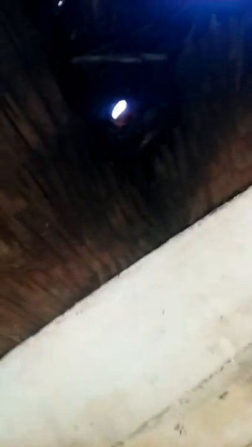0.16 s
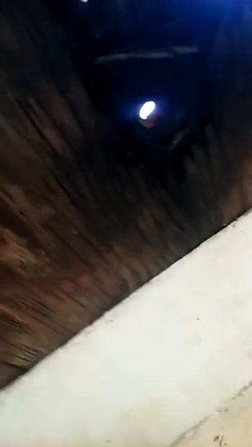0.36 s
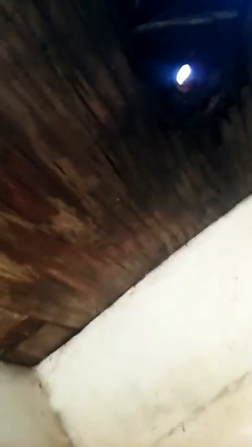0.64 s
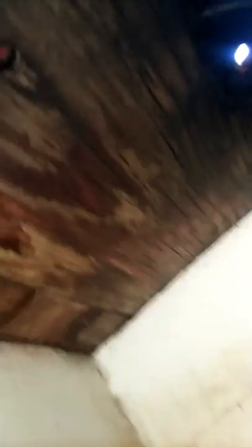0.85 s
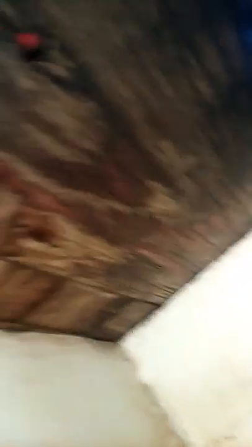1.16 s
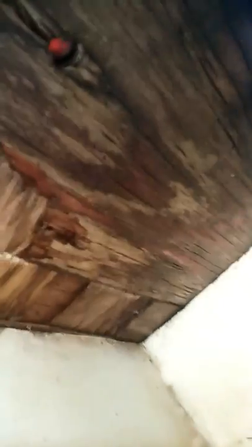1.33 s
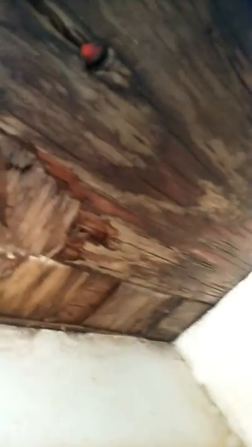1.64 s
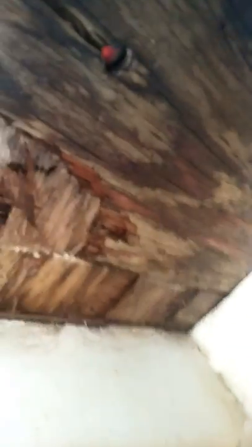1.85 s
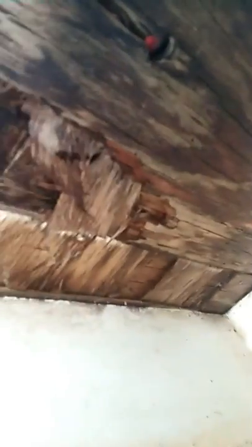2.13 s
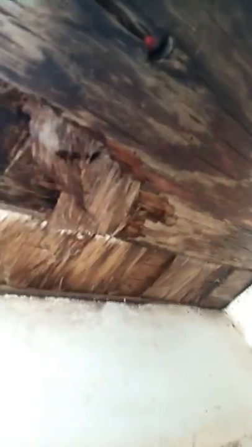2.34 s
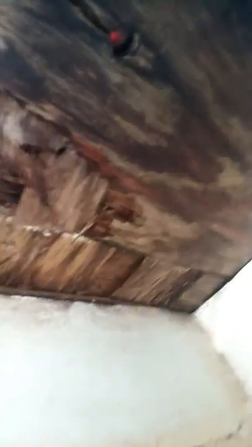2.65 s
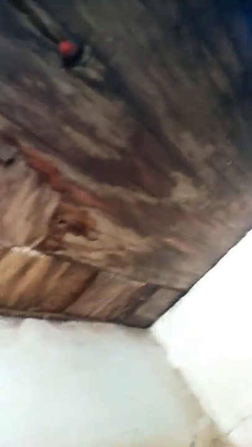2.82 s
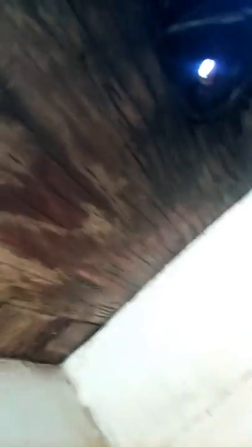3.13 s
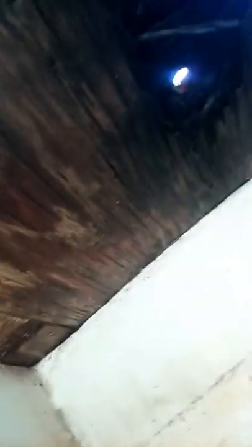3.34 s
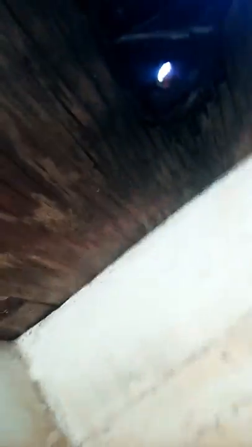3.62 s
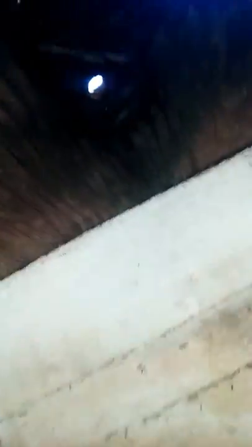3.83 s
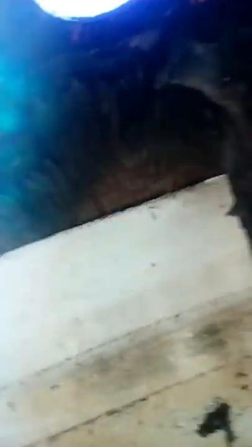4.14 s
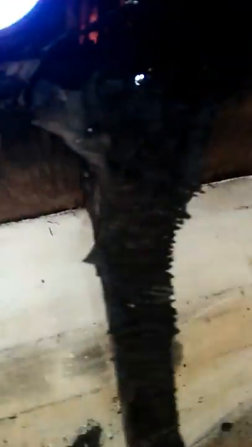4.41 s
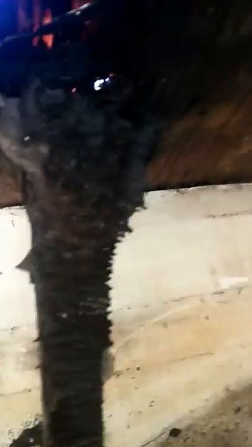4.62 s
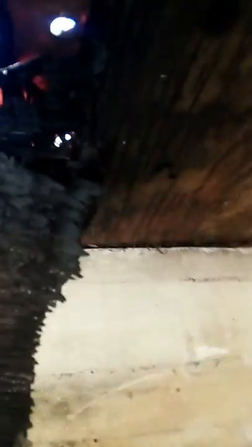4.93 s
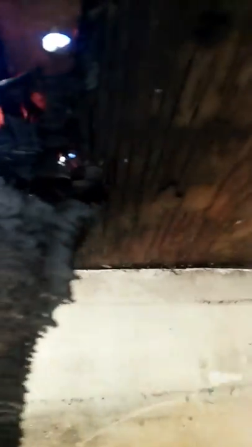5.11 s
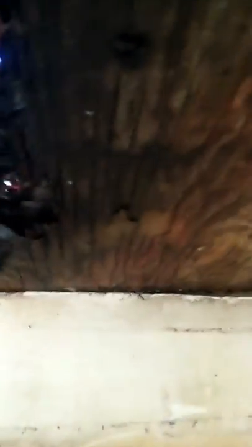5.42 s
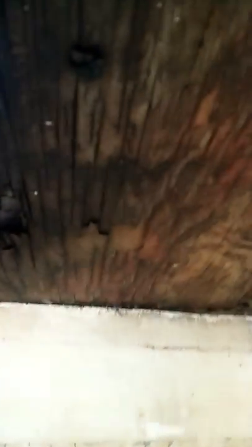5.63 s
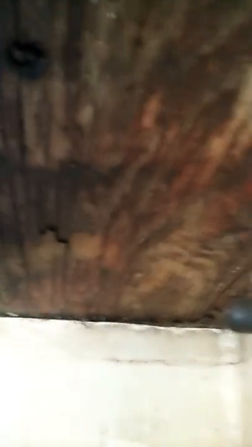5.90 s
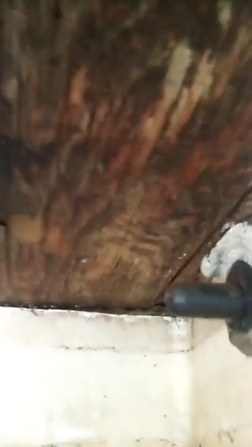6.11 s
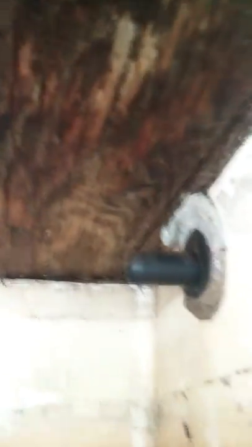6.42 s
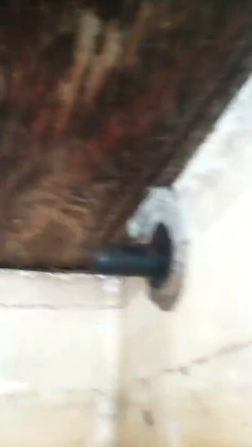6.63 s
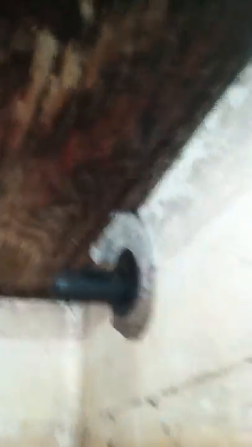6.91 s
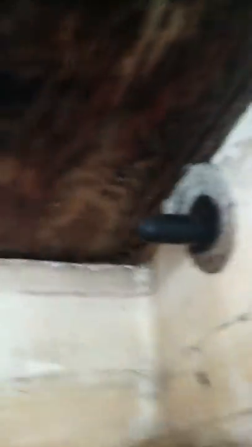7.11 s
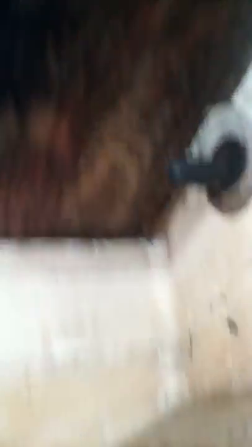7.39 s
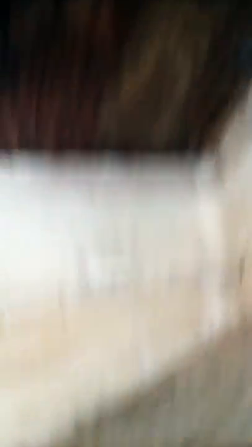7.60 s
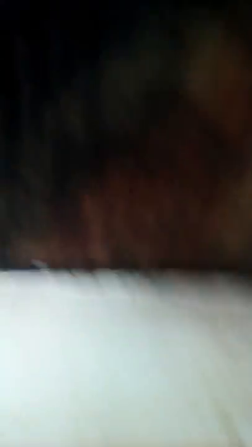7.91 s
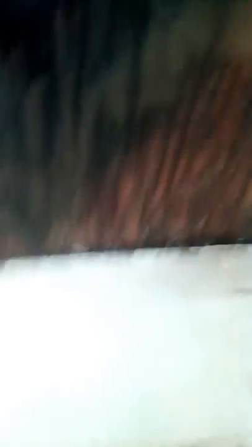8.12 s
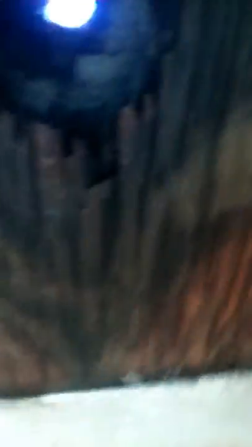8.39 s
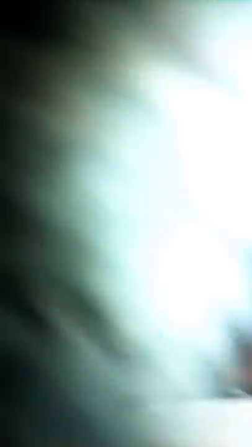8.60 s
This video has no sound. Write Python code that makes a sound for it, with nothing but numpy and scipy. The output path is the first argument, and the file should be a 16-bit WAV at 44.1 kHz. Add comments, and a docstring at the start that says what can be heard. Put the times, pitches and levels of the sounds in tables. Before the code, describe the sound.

Light brushing, a hard snap, quiet gaps, then firmer scrapes, heavy rubs and a flurry of bright clicks against boxy wooden boards.

```python
"""Small wood and fibreglass boat compartment: a hand holding a phone feels along the underside of the deck.
Skin and sleeve brush, scrape and shift on the case: random slips ring coloured filters under stroke envelopes.
Clicks and ticks are decaying noise bursts, soft knocks are damped board modes; these hits get a short, dull tail.
Handling drums a low boom (narrow noise) out of the hollow space; a faint outdoor hush (noise) fills the gaps."""
import sys
import numpy as np
from scipy import signal
from scipy.fft import rfft, irfft, next_fast_len
from scipy.io import wavfile
from scipy.ndimage import uniform_filter1d, map_coordinates

SR = 44100
rng = np.random.default_rng(int(sys.argv[2]) if len(sys.argv) > 2 else 0)


def generate_wav(signal):
    """Clip the signal to [-1, 1] and save it as 16-bit WAV at the path in sys.argv[1]."""
    frames = np.transpose(np.atleast_2d(signal))
    scaled = np.clip(frames, -1, 1) * 32767
    pcm = np.round(scaled).astype(np.int16)
    wavfile.write(sys.argv[1], SR, pcm)


N = 385875

# Broad colour of a hard rub, shared by shove and bump: freq_hz, density_db (relative, per Hz)
SHOVE_TONE = [(150, 9), (250, -2), (410, -1), (590, -6.5), (750, -4), (900, -11.5), (1200, -7.5),
              (1700, -11), (2200, -8), (4000, -10), (6600, -10.5), (8200, -21.5), (15800, -34.5)]
BOOM_T60_S = 0.28  # the hollow space dies away at its own pace, whatever the stroke


def amp(db):
    """Decibels to gain."""
    return 10 ** (np.asarray(db) / 20)


def unit(x):
    """Scale to rms 1."""
    return x / np.sqrt(np.mean(x ** 2) + 1e-20)


def along(points, hz):
    """Join (Hz, value) points on a log frequency axis."""
    f, v = np.transpose(points)
    return np.interp(np.log(hz + 1), np.log(f + 1), v)


def wobble(knots_per_s):
    """Smooth random curve through normally distributed knots."""
    knots = rng.standard_normal(int(N * knots_per_s / SR) + 4)
    return map_coordinates(knots, [np.arange(N) * knots_per_s / SR])


def response(colour_db, size=4096):
    """Causal (minimum-phase) impulse response of a colour in dB against Hz, by folding the cepstrum."""
    gain = amp(colour_db(np.fft.rfftfreq(size, 1 / SR)))
    cepstrum = irfft(np.log(gain + 1e-6))
    cepstrum[1:size // 2] *= 2
    cepstrum[size // 2 + 1:] = 0
    return irfft(np.exp(rfft(cepstrum)))


def coloured(x, tone, ring=()):
    """Filter x by a broad tone plus resonances (freq_hz, width_hz, lift_db)."""
    def colour_db(hz):
        lifts_db = sum(db / (1 + (2 * (hz - f) / width) ** 2) for f, width, db in ring)
        return along(tone, hz) + lifts_db
    return signal.oaconvolve(x, response(colour_db))[:len(x)]


def band(x, kind, edge_hz, order=4):
    """Butterworth high-pass or low-pass."""
    return signal.sosfilt(signal.butter(order, edge_hz, kind, fs=SR, output="sos"), x)


def patchy(x, depth_db, size=1024):
    """Random spectral gain, smoothed over frequency and time: the colour drifts as the contact point moves."""
    z = signal.stft(x, nperseg=size)[2]
    field = uniform_filter1d(rng.standard_normal(z.shape), size=6, axis=0)
    field = uniform_filter1d(field, size=12, axis=1)
    return signal.istft(z * amp(depth_db * unit(field)), nperseg=size)[1][:N]


def steady(x, span_s):
    """Even out chance swells to rms 1, as under a steady drag."""
    size = int(span_s * SR)
    power = uniform_filter1d(uniform_filter1d(x ** 2, size=size), size=size)
    return x / np.sqrt(np.abs(power) + 1e-12 * np.mean(x ** 2))


def add(track, s, sound):
    """Mix a sound in at time s."""
    part = track[round(s * SR):][:len(sound)]
    part += sound[:len(part)]


def sized(x, db, span):
    """Give x the energy that level db has over span seconds."""
    return amp(db) * x * np.sqrt(span * SR) / np.linalg.norm(x)


def envelope(start, length, attack_s, swell_db_per_s, release_s):
    """Contact builds up around the start, swells or sags while the hand moves, then dies with t60 release_s."""
    gain = np.zeros(N)
    first = max(start - attack_s / 2, 0)
    t = np.arange(first - start, length + release_s, 1 / SR)
    rise = np.sin(np.pi / 2 * np.clip(t / attack_s + .5, 0, 1)) ** 2
    held_db = swell_db_per_s * (np.clip(t, 0, length) - length / 2)
    release_db = -60 * np.maximum(t - length, 0) / release_s
    add(gain, first, rise * amp(held_db + release_db))
    return gain


def contact(rows, attack_s, swell_db_per_s, release_s):
    """Gains of boom, rub and hiss over one kind of stroke; hiss comes and goes first, boom comes last and dies
    at the hollow space's own pace."""
    hiss_lead_s = 0.0032  # the fingertips touch and leave before the palm
    boom_lag_s = 0.0055  # the hollow space answers late
    soft_db = 19.5  # a stroke this much softer than the hardest takes twice as long to build up
    boom, rub, hiss = np.zeros((3, N))
    hardest_db = max(row[2] for row in rows)
    for start, length, rub_db, hiss_db, boom_db in rows:
        rise_s = attack_s * 2 ** ((hardest_db - rub_db) / soft_db)
        rub_shape = envelope(start, length, rise_s, swell_db_per_s, release_s)
        hiss_shape = envelope(start - hiss_lead_s, length, rise_s, swell_db_per_s, 0.73 * release_s)
        boom_shape = envelope(start + boom_lag_s, length, rise_s, swell_db_per_s, BOOM_T60_S)
        rub = np.maximum(rub, amp(rub_db) * rub_shape)
        hiss = np.maximum(hiss, amp(rub_db + hiss_db) * hiss_shape)
        boom = np.maximum(boom, amp(rub_db + boom_db) * boom_shape)
    return boom, rub, hiss


def drone():
    """Low boom of the hollow space: coloured noise, its envelope evened as under a steady drag."""
    # freq_hz, density_db (relative, per Hz)
    boom_tone = [(25, -52), (40, -36), (55, -17), (80, -7), (100, -4.5), (118, 7), (138, -0.5), (165, -0.5),
                 (200, -9.5), (260, -15.5), (400, -56), (800, -101)]
    noise = rng.standard_normal(next_fast_len(N))
    wave = signal.hilbert(coloured(noise, boom_tone))[:N]
    power = uniform_filter1d(np.abs(wave) ** 2, size=2200)
    return unit(wave.real / np.sqrt(np.abs(power) + 1e-12))


def stroke(gains, tone, ring, slips_per_s, grit, judder_db, drift_db, bite_db):
    """Friction: tiny slips over the wood grain, in uneven bunches, ring the touched surface."""
    boom, rub, hiss = gains
    slips = (rng.random(N) < slips_per_s / SR) * rng.standard_normal(N)
    force = rng.standard_normal(N) + grit * unit(slips)
    force = force * amp(judder_db * wobble(130))
    sound = coloured(patchy(force, drift_db), tone, ring)
    # the palm drives the board and the fingertips the hiss, so each catches on its own
    mids = band(band(sound, "high", 215), "low", 2006)
    body = steady(mids * amp(2.2 * wobble(50)), span_s=0.043)
    fizz = steady(band(sound, "high", 2690) * amp(1.6 * wobble(70)), span_s=0.039)
    # the harder the stroke, the more the finest fibres crackle on top
    hardness = (hiss / hiss.max()) ** .55
    crackle = amp(bite_db) * hardness * unit(band(slips, "high", 6600))
    return rub * body + hiss * (fizz + crackle) + boom * drone()


def brush():
    """Light brushing close to the phone: dense slips ring the boards."""
    # Strokes: start_s, length_s, rub_db, hiss_over_rub_db, boom_over_rub_db
    strokes = [(0, 0.026, -53, -5.5, -2), (.14, 0.04, -58.5, -5, 5), (.315, 0.029, -55, -6.5, 7),
               (.711, 0.041, -47, 0.5, 1), (.738, 0.05, -47, 4, 3), (.82, 0.12, -54.5, 2, 4),
               (1, 0.074, -66, 0.5, 7), (1.18, 0.023, -57.5, -3, 8.5), (1.33, 0.033, -63, -1, 5),
               (1.54, 0.019, -62.5, -2, 5), (3.12, 0.01, -53.5, -2.5, 8), (3.17, 0.17, -66.5, 2.5, 9),
               (3.348, 0.01, -52.5, -12.5, 4), (3.49, 0.073, -54, -4.5, -1), (3.632, 0.064, -52, -4.5, -3),
               (3.722, 0.046, -49.5, -5, 0.5), (3.885, 0.042, -71.5, 8.5, 12.5),
               (4.007, .04, -45, -3.5, -2), (4.048, 0.047, -41.5, -1, 2.5), (4.15, 0.059, -50.5, 4, -8),
               (4.335, .085, -56, -4.5, -22), (4.415, .05, -50, -6, -12), (4.46, 0.061, -46, -8, -11.5),
               (4.55, 0.14, -61, -13, -2.5), (4.73, 0.071, -55.5, -14.5, -11),
               (4.85, 0.064, -55.5, -10.5, -5), (4.93, 0.035, -55, -12.5, -8)]
    # Broad colour: freq_hz, density_db (relative, per Hz)
    tone = [(150, -2.5), (230, -4.5), (330, 2), (520, -12.5), (800, -14.5), (1250, -15), (1800, -17),
            (2500, -20), (3200, -18.5), (4300, -15), (6600, -18), (9500, -31), (15800, -38)]
    # Resonances: freq_hz, width_hz, lift_db
    ring = [(668, 46, 7.5), (928, 900, 0), (1040, 23, 10), (1275, 86, 2), (1760, 430, 0), (1940, 74, 11),
            (2167, 92, 10.5), (2470, 380, 0), (3160, 280, 5.5), (3880, 810, -7), (4750, 400, -5),
            (5500, 200, 3.5), (6230, 380, 5.5)]
    gains = contact(strokes, attack_s=0.017, swell_db_per_s=-11.5, release_s=0.34)
    return stroke(gains, tone, ring, slips_per_s=840, grit=0.39, judder_db=-0.2, drift_db=2.5, bite_db=-16.5)


def palm():
    """The palm drags without scratching: it catches unevenly and drums only the hollow space."""
    # Drags: start_s, length_s, level_db
    drags = [(0, 0.34, -51), (0.444, 0.082, -50), (0.596, 0.086, -47.5), (2.85, 0.057, -64),
             (3.418, 0.072, -60), (7.524, 0.18, -56), (7.894, 0.28, -54)]
    gain = np.zeros(N)
    for start, length, db in drags:
        gain += amp(db) * envelope(start, length, attack_s=0.016, swell_db_per_s=-19.5, release_s=BOOM_T60_S)
    return gain * unit(drone() * amp(2.8 * wobble(30)))


def hush():
    """Faint outdoor noise seeps through the hull, under a thin hiss; both swell, sink and briefly dip."""
    # Levels: time_s, outdoor_db, hiss_db
    swells = [(0, -63.5, -69.5), (.6, -61.5, -71.5), (1.05, -62.5, -68), (1.45, -66, -74),
              (1.7, -60.5, -78), (1.95, -61, -81), (2.33, -62.5, -75.5), (2.42, -68.5, -86.5),
              (2.94, -66, -81.5), (3.2, -64, -70.5), (4.2, -62.5, -67), (5, -60, -75), (6.3, -58, -73),
              (6.95, -56.5, -72.5), (7.7, -64.5, -68), (8.3, -57, -69), (8.75, -60.5, -75)]
    # Outdoor colour: freq_hz, density_db (relative, per Hz)
    tone = [(30, -20), (60, 5.5), (115, 14), (170, 4), (260, -1.5), (350, 8), (510, -1), (720, 3.5),
            (1020, 3), (1400, -0.5), (1900, -3.5), (2500, -8.5), (3200, -18), (5500, -15.5), (8000, -22.5),
            (15800, -46)]
    # Brief dips: centre_s, half_width_s (to 1/e of the depth), depth_db
    dips = [(2.8, 0.023, -12), (3.05, 0.059, -7.5)]
    t = np.arange(N) / SR
    times, *levels = np.transpose(swells)
    outdoor_db, hiss_db = (np.interp(t, times, level) for level in levels)
    dip_db = sum(db * np.exp(-((t - s) / width) ** 2) for s, width, db in dips)
    outdoors = unit(coloured(patchy(rng.standard_normal(N), depth_db=3.5), tone))
    hiss = unit(band(rng.standard_normal(N), "high", 2400, order=1))
    return amp(dip_db) * (amp(outdoor_db) * outdoors + amp(hiss_db) * hiss)


def burst(t, t60, spike):
    """Sudden release (one-sample spike) followed by exponentially dying noise chatter."""
    chatter = rng.standard_normal(len(t)) * amp(-60 * t / max(t60, .002))
    return chatter / np.linalg.norm(chatter) + spike * (t == 0)


def snap(t, t60, ring_hz):
    """Bright tick: its whole colour scales with ring_hz, lower for a larger splinter."""
    # ring_multiple, level_db
    snap_tone = [(.25, -27), (.4, -8), (.6, -12.5), (.78, -10.5), (1, -5), (1.2, -0.5), (1.4, -9),
                 (1.75, -15.5), (2.7, -25.5), (4, -48.5)]
    tone = [(multiple * ring_hz, db) for multiple, db in snap_tone]
    return coloured(burst(t, t60, spike=0.25), tone, [(ring_hz, 900, 10)])


def clicks():
    """A nail or splinter snaps free: ringing tick over a slower wooden body."""
    # Clicks: time_s, snap_db, body_db, ring_hz
    events = [(.177, -45, -65, 5100), (.282, -45, -76, 5450), (.902, -28.5, -31.5, 5500),
              (1.2041, -53.5, -64, 5740), (1.9913, -51.5, -83, 5500), (2.859, -54.5, -68, 2580),
              (3.633, -49.5, -66, 5800), (3.843, -56, -52.5, 5040), (4.626, -57.5, -58, 6300),
              (4.832, -60, -54.5, 5500), (5.228, -59.5, -50.5, 3200), (6.199, -52, -58, 6000),
              (6.556, -59, -52.5, 5640), (7.044, -57, -70, 5770), (8.117, -44, -45.5, 5500),
              (8.199, -45, -49.5, 5600), (8.371, -58, -42.5, 5400), (8.4445, -32, -41, 5400),
              (8.543, -40, -55, 6200), (8.593, -28, -40.5, 5870), (8.629, -46, -54, 4800)]
    # Wooden body colour: freq_hz, level_db
    body_tone = [(60, -18.5), (150, -10), (355, 3), (550, 0.5), (1100, -3), (1700, -5.5), (2150, -9),
                 (2800, -12.5), (3600, -6.5), (6000, -34)]
    decay_cycles = 160  # snap t60 in ring cycles, so low clicks last longer
    out, t = np.zeros(N), np.arange(SR // 6) / SR
    for s, snap_db, body_db, ring_hz in events:
        t60 = decay_cycles / ring_hz
        body = coloured(burst(t, 1.3 * t60, spike=0.39), body_tone)
        add(out, s, sized(snap(t, t60, ring_hz), snap_db, span=0.0046))
        add(out, s, sized(body, body_db, span=0.009))
    return out


def ticks():
    """Single fibres let go, too light to move the board: only a short, dry, bright tick."""
    # Ticks: time_s, level_db
    events = [(0.273, -59), (1.05, -49), (1.0825, -57), (1.107, -62), (1.123, -57), (1.2513, -61),
              (1.269, -61), (5.743, -66)]
    tick_hz, tick_t60_s = 5920, .009
    out, t = np.zeros(N), np.arange(SR // 20) / SR
    for s, db in events:
        add(out, s, sized(snap(t, tick_t60_s, tick_hz), db, span=0.0065))
    return out


def knocks():
    """A soft bump of the hand rings the board's low modes while the skin slaps and slides."""
    # Knocks: time_s, thud_db, slap_db
    events = [(1.189, -51, -66), (1.322, -46, -53.5), (1.5233, -40, -57.5), (2.129, -48, -66),
              (2.2481, -46.5, -62), (3.124, -47, -59.5), (3.3115, -44, -58.5), (3.887, -53, -61),
              (4.836, -42.5, -68), (7.129, -48, -68)]
    # Mean board modes: freq_hz, level_db (relative), t60_s
    board = [(119, -3.5, 0.06), (166, 0, 0.061), (222, 4.5, 0.036), (323, -1.5, 0.048), (399, -9.5, 0.11),
             (558, -10, 0.039), (678, -5.5, 0.029), (1035, -20.5, 0.054)]
    out, t = np.zeros(N), np.arange(SR // 4) / SR
    for s, thud_db, slap_db in events:
        thud = np.zeros(len(t))
        for hz, db, t60 in board:
            mode_hz = hz * (1 + rng.normal(0, 0.0089))
            phase = 2 * np.pi * (mode_hz * t + rng.random())
            thud += amp(db + rng.normal(0, 3) - 60 * t / t60) * np.sin(phase)
        thud *= 1 - np.exp(-t / 0.0057)  # flesh cushions the attack
        add(out, s, sized(thud, thud_db, span=0.014))
        add(out, s, sized(snap(t, 0.047, 5720), slap_db, span=0.014))
    return out


def fibres(start, end, loudest_db, count):
    """Loose fibres catch on the slowly sliding sleeve: faint ticks at random times, levels and pitches."""
    out, t = np.zeros(N), np.arange(SR // 20) / SR
    for when, softness, pitch in rng.random((count, 3)):
        tick = snap(t, 0.038, 3500 + 3000 * pitch)
        add(out, start + when * (end - start), sized(tick, loudest_db - 9 * softness, span=0.022))
    return out


def compartment(x):
    """The close walls answer with a short, dull tail: convolution with decaying low-passed noise."""
    t = np.arange(SR // 4) / SR
    noise = band(rng.standard_normal(len(t)), "low", 5400, order=1)
    tail = noise * amp(-60 * t / 0.39) * (t > .003)
    return signal.oaconvolve(x, tail / np.linalg.norm(tail))[:N]


def scrape():
    """The arm slides along the boards: sparser slips, slow attack."""
    # Strokes: start_s, length_s, rub_db, hiss_over_rub_db, boom_over_rub_db
    strokes = [(5.21, 0.061, -63.5, -1.5, -4), (6.21, .06, -56, -5.5, -12), (6.272, 0.058, -45, -7.5, -10),
               (6.34, .2, -49.5, -6.5, -15), (6.56, 0.061, -53.5, -7, -17), (6.735, 0.099, -53, -4, -14),
               (7.055, .04, -44.5, -5.5, -24), (7.095, 0.027, -41, -5, -16), (7.17, 0.12, -66.5, 1, 5.5)]
    # Broad colour: freq_hz, density_db (relative, per Hz)
    tone = [(150, -22), (230, -8), (400, 1.5), (560, -3.5), (750, 6), (1250, -0.5), (1700, -1.5),
            (2800, -7.5), (3400, -12), (5700, -21.5), (8000, -24.5), (15800, -41)]
    # Resonances: freq_hz, width_hz, lift_db
    ring = [(318, 89, 10), (515, 33, 8), (684, 33, 11), (960, 90, 5.5), (1700, 300, 8), (2390, 470, -7),
            (2720, 76, 9.5), (3620, 500, -9.5), (4450, 170, 6.5), (5750, 1200, 9.5)]
    gains = contact(strokes, attack_s=0.057, swell_db_per_s=-16, release_s=0.19)
    return stroke(gains, tone, ring, slips_per_s=300, grit=0.53, judder_db=0.5, drift_db=2.5, bite_db=-28.5)


def shove():
    """A hard shove past an edge: dense slips, quick release."""
    # Strokes: start_s, length_s, rub_db, hiss_over_rub_db, boom_over_rub_db
    strokes = [(7.326, 0.076, -43, -3, -6), (7.417, 0.039, -37.5, -3, -14)]
    # Resonances: freq_hz, width_hz, lift_db
    ring = [(329, 79, 12.5), (493, 50, 5.5), (570, 51, -7), (656, 30, 15), (1024, 81, 14.5),
            (1280, 46, -16), (1685, 140, 9), (2360, 300, -12), (3850, 250, 6), (4520, 300, -11.5),
            (5600, 180, 4), (6760, 330, 6)]
    gains = contact(strokes, attack_s=0.031, swell_db_per_s=-11, release_s=0.11)
    return stroke(gains, SHOVE_TONE, ring, slips_per_s=990, grit=0.52, judder_db=1.6, drift_db=3.1, bite_db=-25)


def bump():
    """A short, heavy swipe wakes the panel's resonances and sags fast."""
    # Strokes: start_s, length_s, rub_db, hiss_over_rub_db, boom_over_rub_db
    strokes = [(7.801, 0.059, -40, -3, -4), (7.955, 0.028, -50, -6.5, 1), (7.98, 0.029, -47, -7, 2.5)]
    # Resonances: freq_hz, width_hz, lift_db
    ring = [(403, 70, 9.5), (667, 37, 15), (1071, 51, 17), (1310, 60, -3), (2080, 180, -16),
            (3200, 410, 2.5), (4270, 200, 2.5), (6300, 500, 2.5)]
    gains = contact(strokes, attack_s=0.027, swell_db_per_s=-66, release_s=0.14)
    return stroke(gains, SHOVE_TONE, ring, slips_per_s=940, grit=0.48, judder_db=2.55, drift_db=1.0, bite_db=-19)


def grip():
    """Fingers shift on the case: gritty, juddering slips."""
    # Strokes: start_s, length_s, rub_db, hiss_over_rub_db, boom_over_rub_db
    strokes = [(8.09, 0.45, -59.5, 0, 3.5), (8.113, 0.021, -45.5, -1.5, -11), (8.14, 0.038, -55, 3.5, 1),
               (8.19, 0.01, -46, 3.5, -19), (8.268, 0.018, -48.5, -2, -5), (8.345, .02, -49, -1, 0),
               (8.369, 0.022, -42.5, 0.5, -4.5), (8.405, 0.067, -50.5, -0.5, 0),
               (8.536, 0.051, -46.5, 3, -5), (8.64, 0.084, -51, 4, 3)]
    # Broad colour: freq_hz, density_db (relative, per Hz)
    tone = [(150, -5), (250, -1.5), (400, 3.5), (550, -10.5), (800, -1.5), (1250, -2.5), (1700, -30),
            (2300, -13), (3000, -10.5), (6400, -6.5), (8000, -16), (11000, -20), (15800, -29)]
    # Resonances: freq_hz, width_hz, lift_db
    ring = [(372, 76, 3.3), (679, 100, 12.6), (1037, 32, 9.8), (1250, 62, 8), (1800, 190, 1),
            (2800, 200, 6.3), (4340, 290, 3.6), (5130, 230, 4)]
    gains = contact(strokes, attack_s=0.014, swell_db_per_s=6, release_s=0.13)
    return stroke(gains, tone, ring, slips_per_s=720, grit=0.62, judder_db=2.7, drift_db=1.0, bite_db=-14.0)


def scene():
    """Rubbing, hits and the hits' echo over the hush."""
    rubbing = brush() + palm() + scrape() + shove() + bump() + grip()
    hits = clicks() + ticks() + knocks() + fibres(start=4.6, end=7.3, loudest_db=-67.5, count=20)
    echo = amp(-21) * compartment(hits)
    return (rubbing + hits + echo + hush())[None]


def record(dry):
    """The phone keeps nothing above its band limit: a sharp spectral cut."""
    top_hz = 15850
    size = next_fast_len(N + SR // 2)
    kept = np.fft.rfftfreq(size, 1 / SR) < top_hz
    return irfft(rfft(dry, size) * kept, size)[..., :N]


dry = scene()
out = record(dry)
generate_wav(out)
```